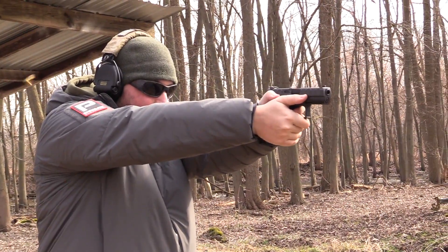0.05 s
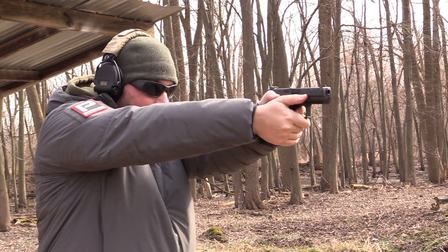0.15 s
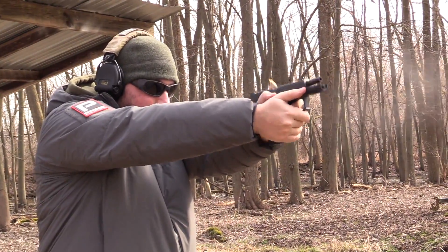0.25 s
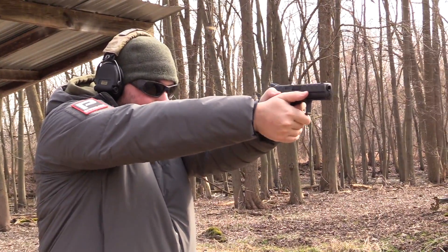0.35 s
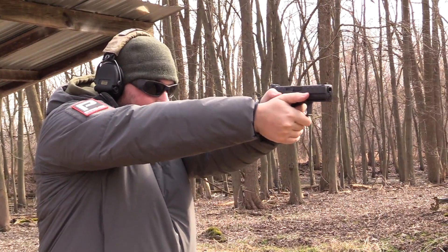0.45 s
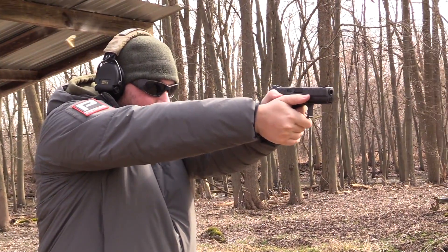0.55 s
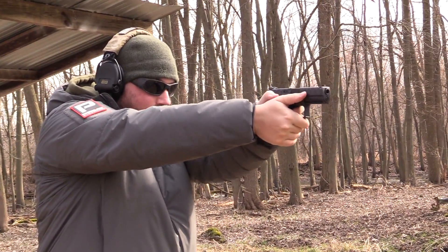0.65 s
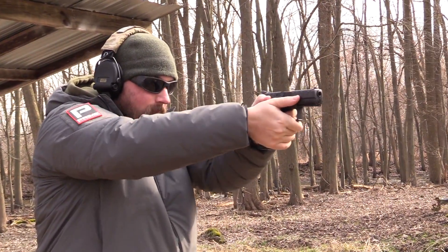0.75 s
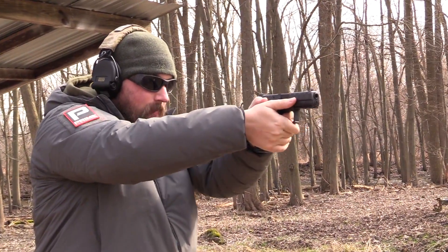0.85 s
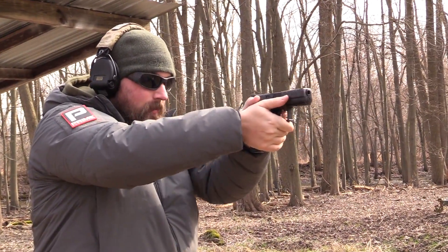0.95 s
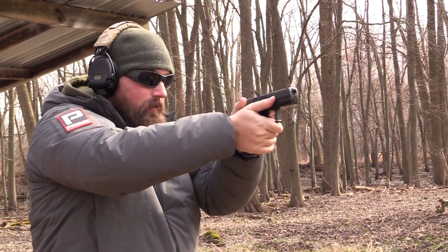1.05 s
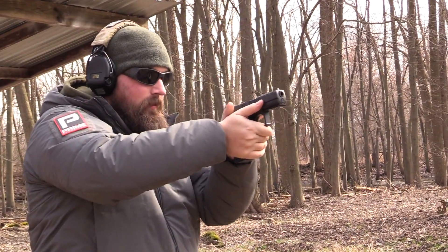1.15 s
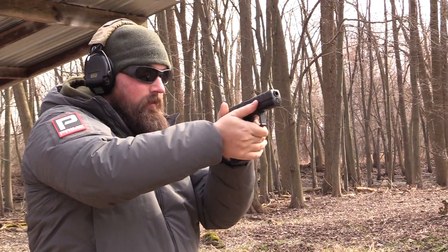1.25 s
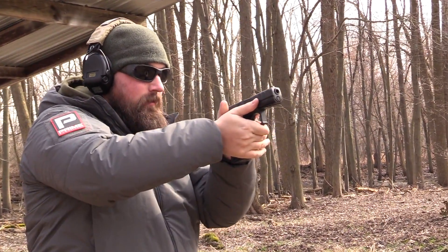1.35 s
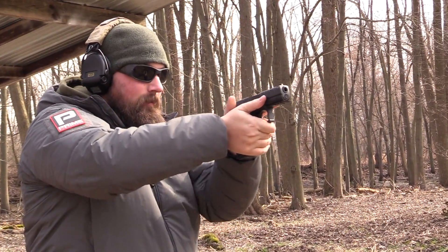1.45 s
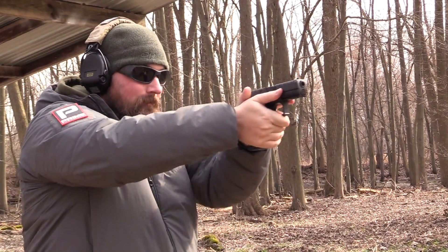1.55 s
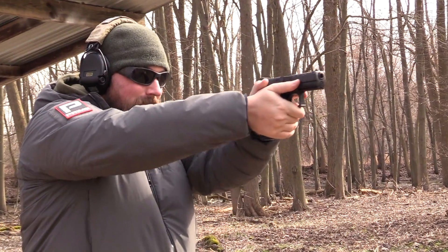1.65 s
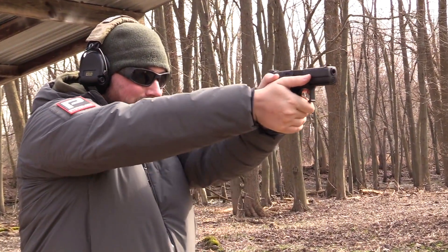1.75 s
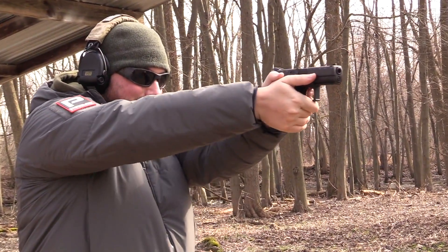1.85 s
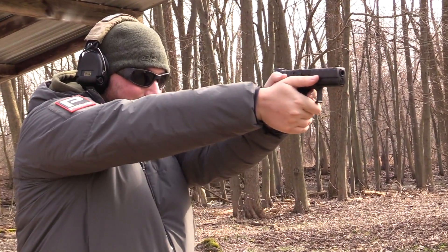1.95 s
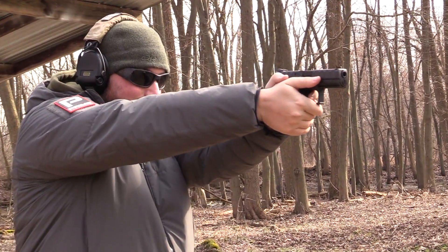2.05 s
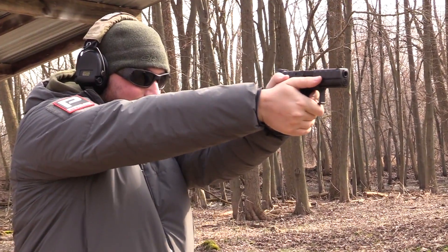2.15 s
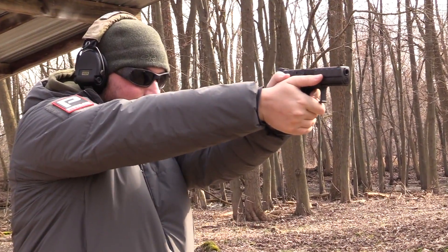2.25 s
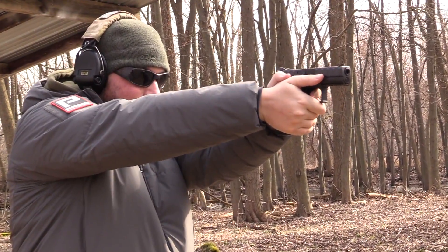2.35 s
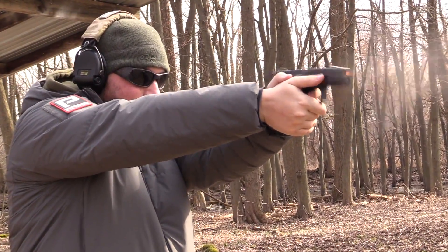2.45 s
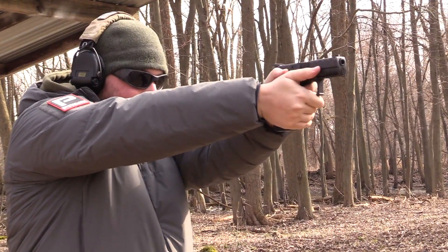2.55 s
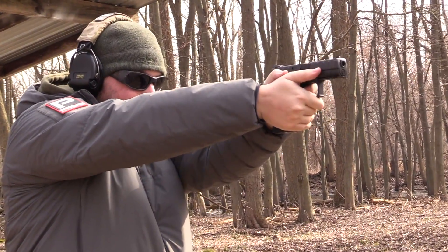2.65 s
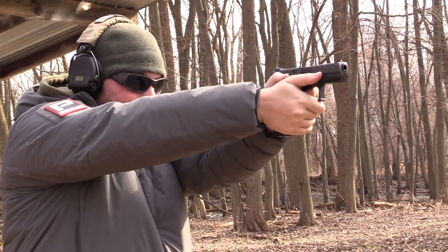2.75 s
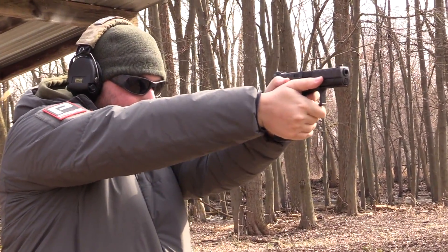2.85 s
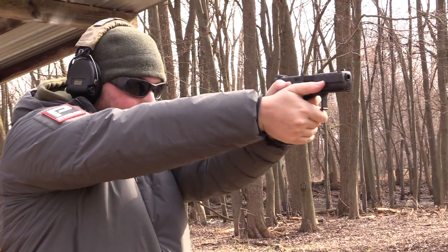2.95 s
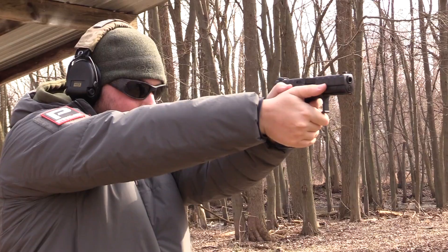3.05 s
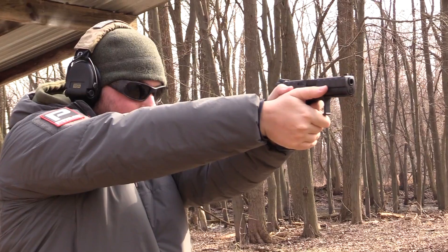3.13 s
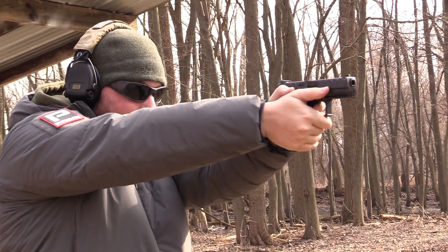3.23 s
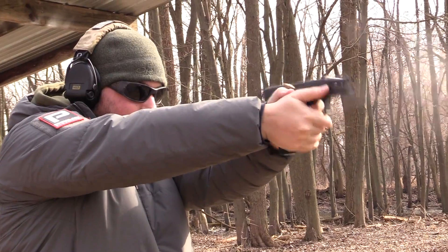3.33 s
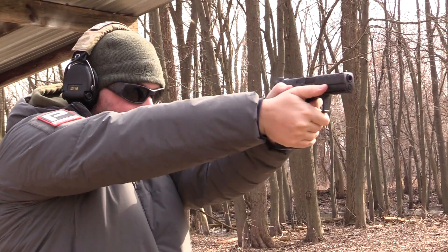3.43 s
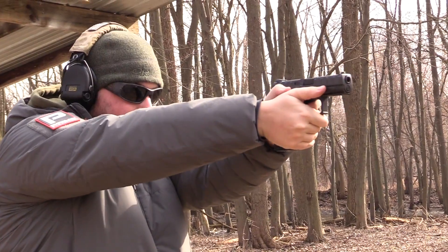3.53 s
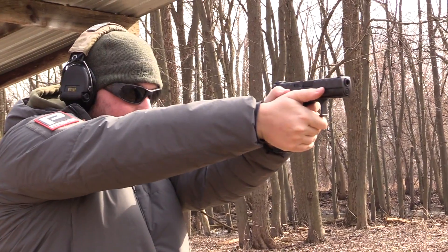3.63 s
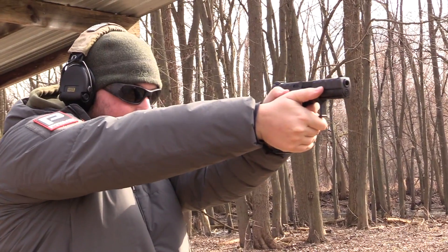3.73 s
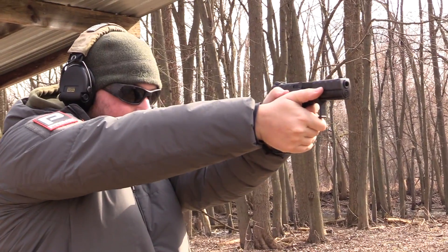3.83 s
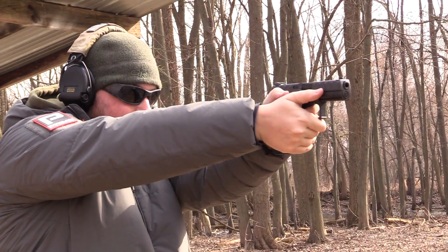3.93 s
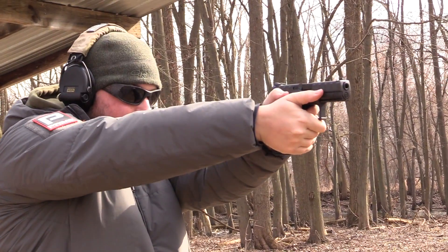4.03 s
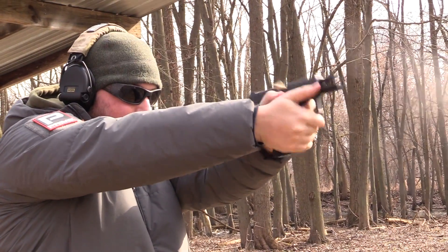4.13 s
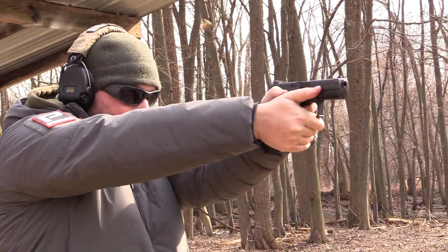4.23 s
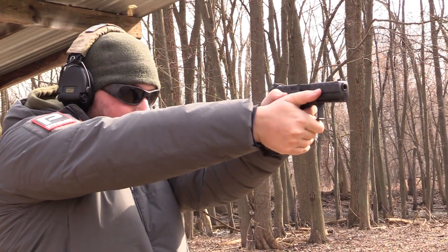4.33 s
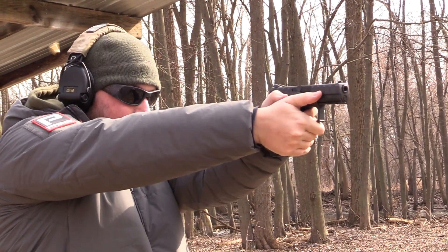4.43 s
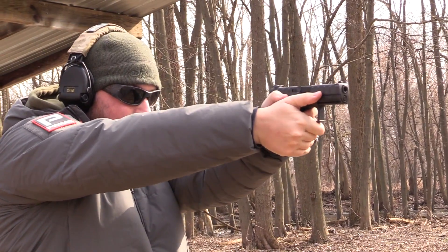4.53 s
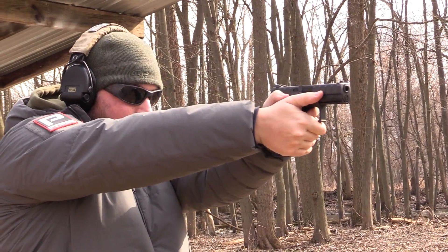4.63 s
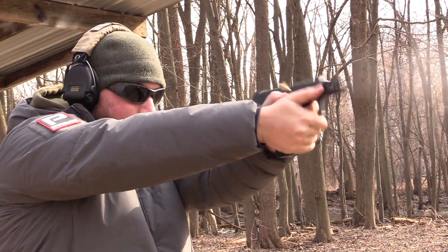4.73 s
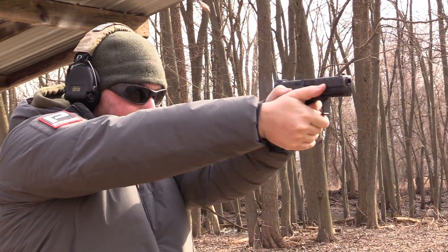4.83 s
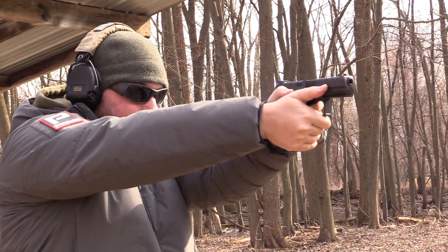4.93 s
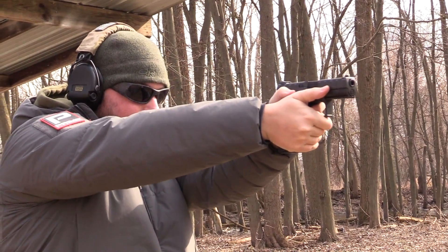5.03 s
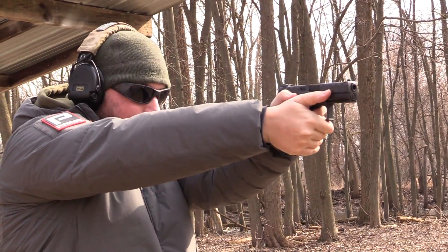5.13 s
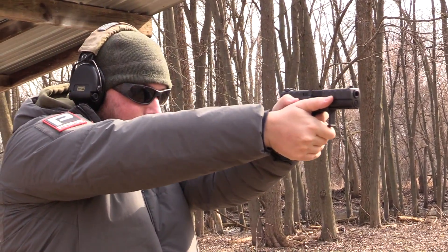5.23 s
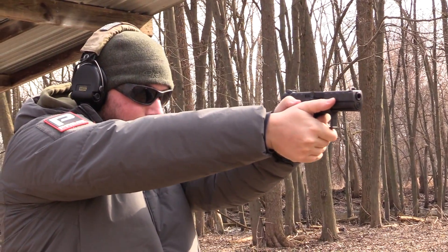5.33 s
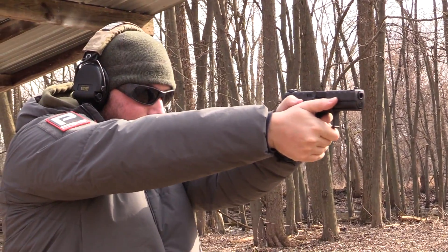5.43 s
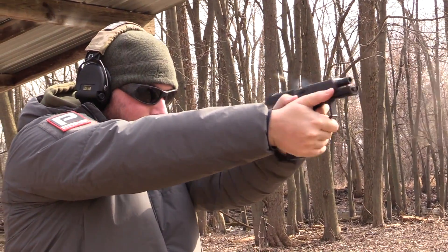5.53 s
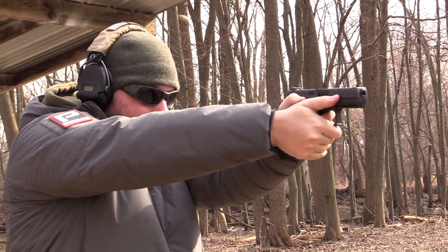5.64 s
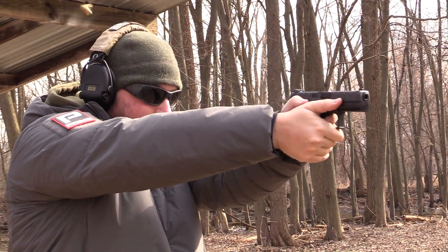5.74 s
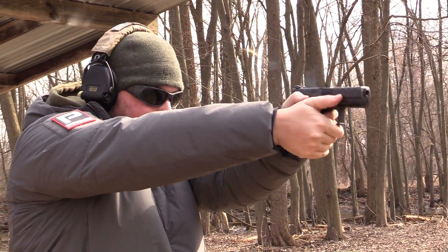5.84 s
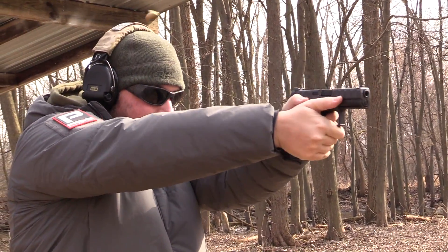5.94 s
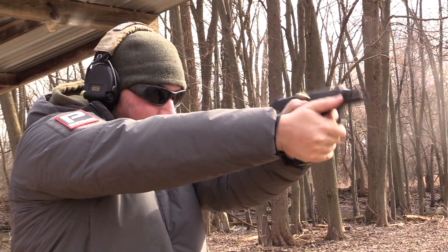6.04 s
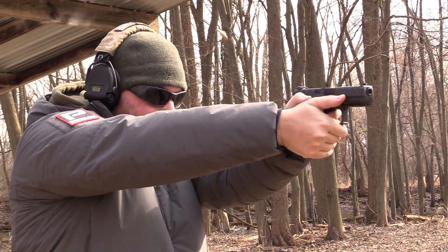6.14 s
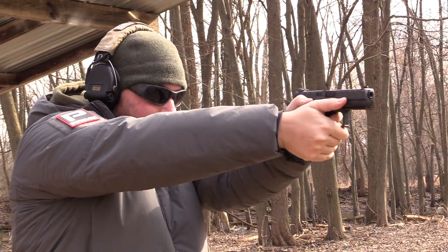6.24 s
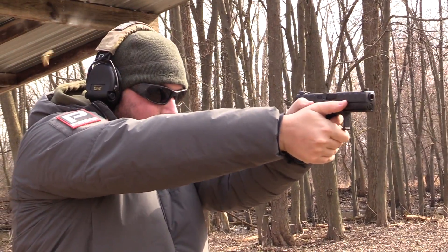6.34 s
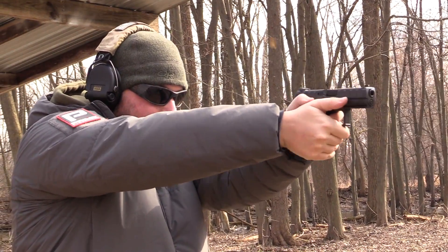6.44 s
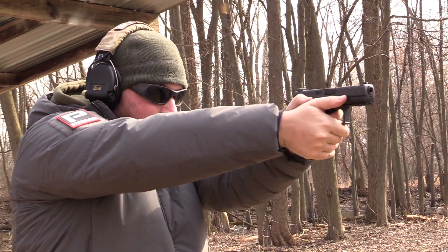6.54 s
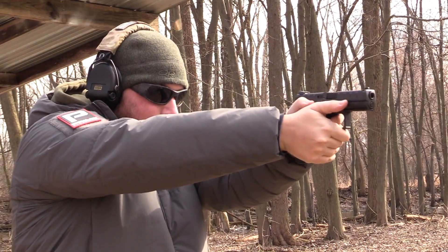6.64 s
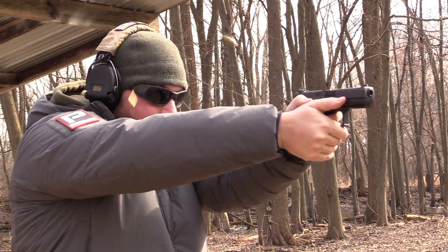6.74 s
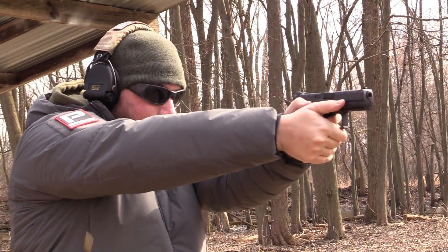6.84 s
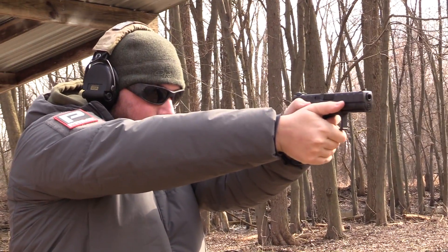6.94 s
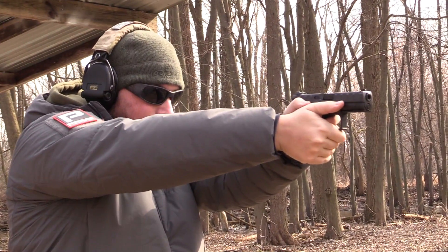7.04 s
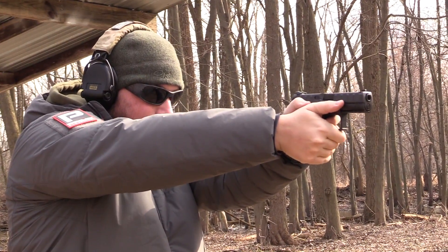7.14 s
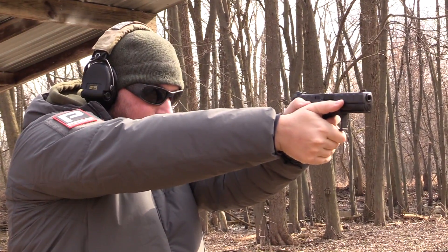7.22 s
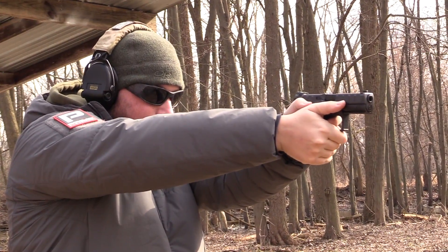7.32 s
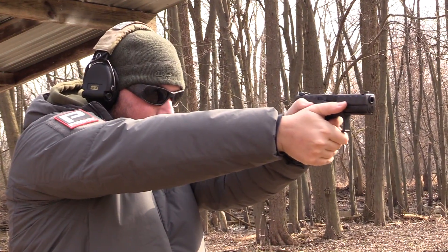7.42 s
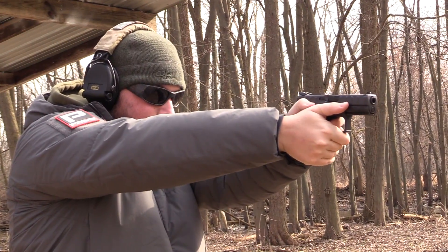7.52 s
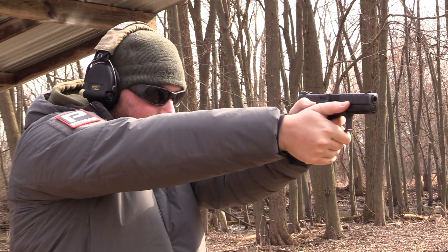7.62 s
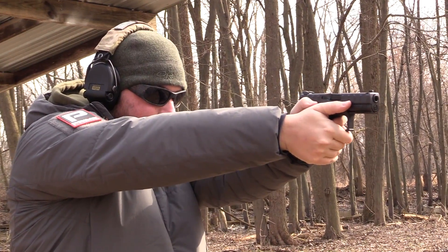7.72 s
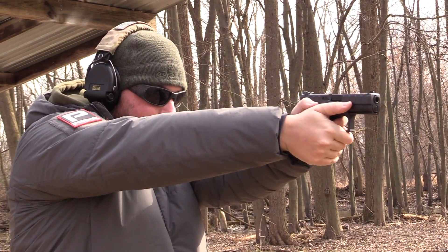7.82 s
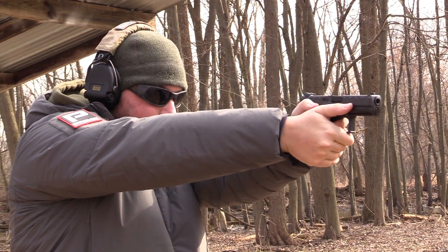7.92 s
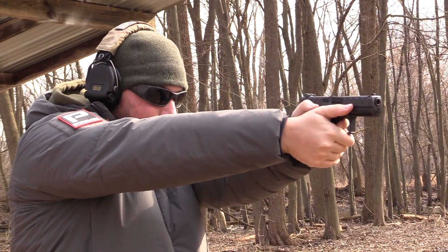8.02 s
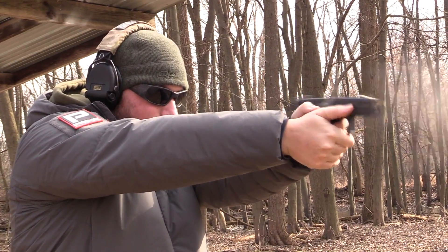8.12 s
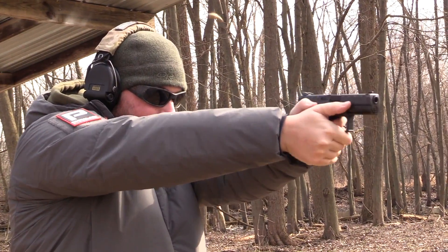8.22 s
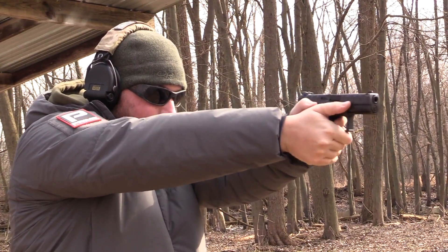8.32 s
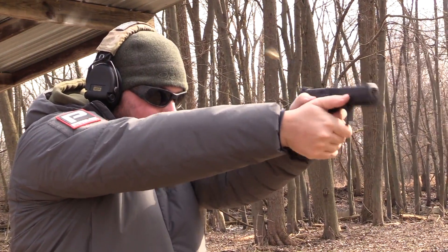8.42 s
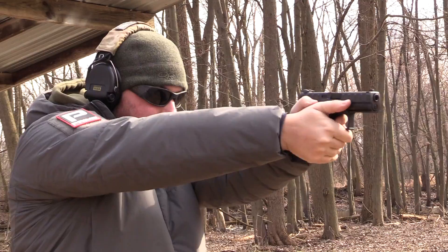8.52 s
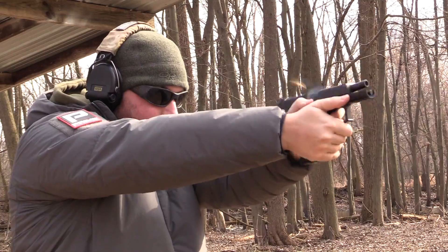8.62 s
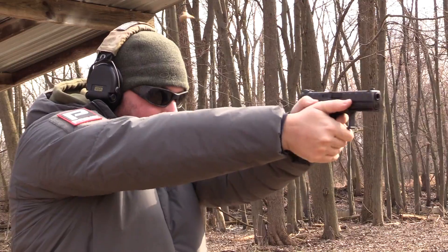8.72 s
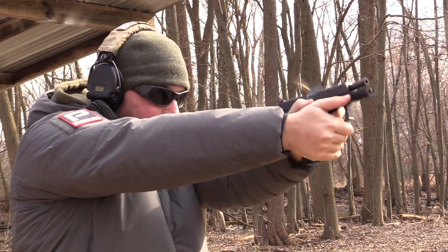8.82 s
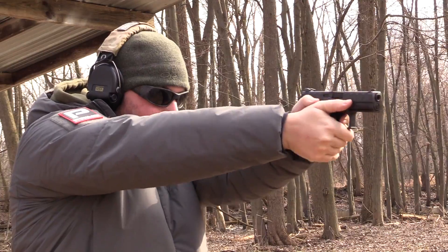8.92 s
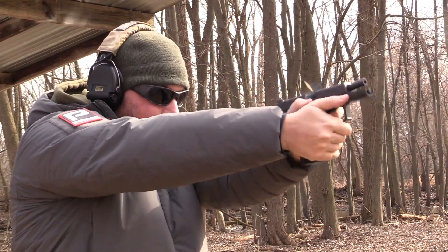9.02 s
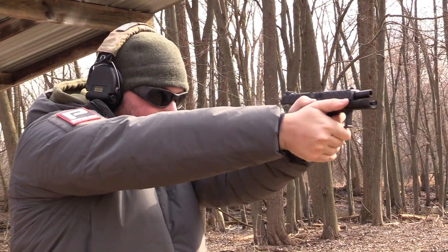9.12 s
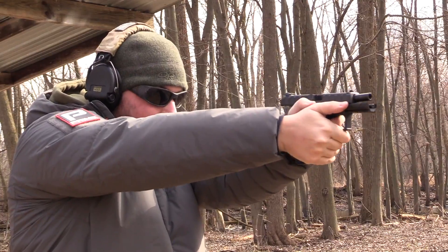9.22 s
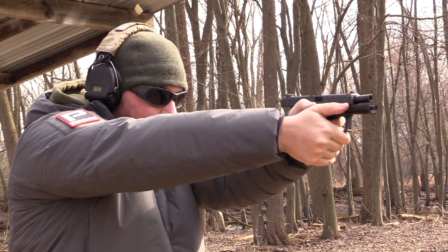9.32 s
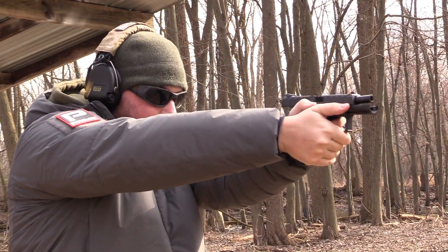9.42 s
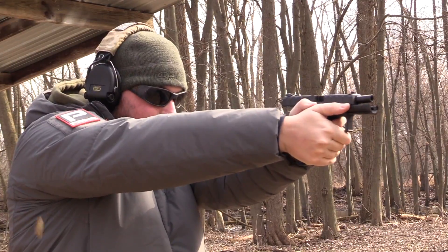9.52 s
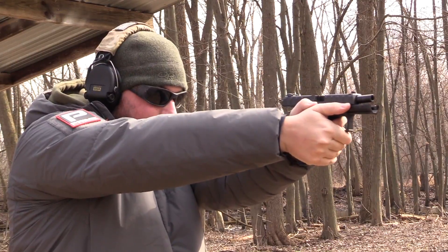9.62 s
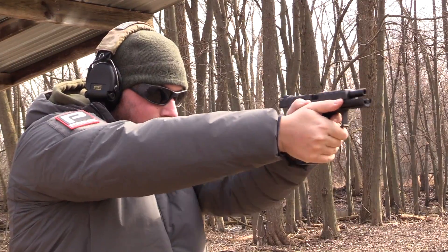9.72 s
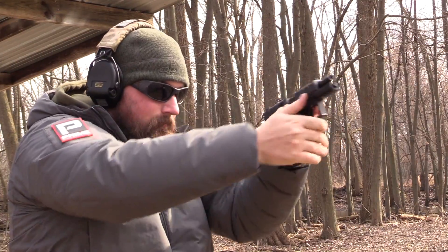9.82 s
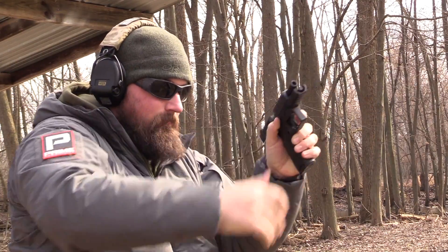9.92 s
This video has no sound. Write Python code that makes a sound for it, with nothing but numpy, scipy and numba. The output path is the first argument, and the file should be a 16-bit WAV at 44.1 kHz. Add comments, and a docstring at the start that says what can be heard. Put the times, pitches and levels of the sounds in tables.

```python
"""Range shelter at the edge of a wood: a pistol is fired fifteen times, close to a camera's microphone. Each
blast is a decaying push with echoes off shooter, ground, roof and backstop, then rolls on in the trees. Trigger
and grip click between shots, the slide clacks after each; spent cases clack down, ring and skitter. Blasts push
the capsule too; wind and amplifier hiss lie behind. The camera overloads and ducks at every shot, then slowly
lets echo, wind and hiss swell back."""
import sys
import numpy as np
from scipy import signal
from scipy.fft import rfft, irfft, next_fast_len
from scipy.io import wavfile
from numba import njit

SR = 44100
rng = np.random.default_rng(int(sys.argv[2]) if len(sys.argv) > 2 else 0)


def inscribe(sig):
    """Save sig as 16-bit PCM at rate SR to the path in sys.argv[1].

    A 1-D sig is mono; a 2-D sig holds one channel per row.
    Samples are clipped to [-1, 1] before scaling.
    """
    pcm = np.round(np.clip(np.atleast_2d(sig).T, -1, 1) * 32767)
    wavfile.write(sys.argv[1], SR, pcm.astype(np.int16))


N = 439677

# Shots; the first is fired just before the start, so only its tail is heard:
# start_s, relative_level_db, ignition_rasp_db, rasp_dull_above_hz
PISTOL_SHOTS = [(-.26, 2, -2, 14400), (0.3393, -1, 14.5, 14000), (2.56, -1.5, 9, 5970),
                (3.4378, -2, 6, 16000), (4.2320, -2.5, 9.5, 12000), (4.835, -2.5, 5, 14180),
                (5.6157, -0.5, 11, 17200), (5.8780, -2, 4, 14000), (6.1370, -2.5, -8, 14000),
                (6.466, -1, 9, 16000), (6.7745, -4, -3, 14000), (8.232, 0.5, -4.5, 19000),
                (8.4782, -1.5, -10.5, 14000), (8.7076, -2.5, -2, 14100), (8.9147, -4, -3, 14000),
                (9.1148, -4.5, -6, 14000)]
# Paths from muzzle to microphone, from arms and body to ground, roof and backstop:
# delay_ms, level_db, dull_above_hz
BLAST_ECHOES = [(.706, 2.5, 725), (1.461, 5, 234.5), (4.383, -10, 1200), (16.3, -37.5, 2100),
                (17.6, -36, 2900), (24.4, -59, 2100), (49.15, -37.5, 2600), (50.24, -37.5, 1200)]
# Reverberation of the wood: frequency_hz, density_db (per Hz, relative), t60_s
WOOD_REVERB = [(60, -4.5, 3), (200, -2, 1.7), (323, 2, 6.07), (628, -3.5, 4.97), (726, 0.5, 5.5),
               (1197, -2, 4.55), (1495, -11.5, 4.96), (2018, -9.5, 3.84), (2830, -16.5, 2.78),
               (4540, -19, 1.83), (6340, -18.5, 1.08), (9600, -16.5, .78), (15900, -21.5, 0.79)]
# Scatter from the shelter's posts and rafters: frequency_hz, density_db (per Hz, relative), t60_s
SHELTER_SCATTER = [(98.8, -11.5, 0.16), (369.7, 0.5, 0.1), (900, -5.5, 0.17), (1880, -13.5, 0.11),
                   (4790, -23.5, 0.15), (15000, -23, 0.14)]
# Trigger and grip clicks: start_s, level_db
TRIGGER_CLICKS = [(.933, -46), (1.02, -28.5), (2.5104, -48), (3.3428, -29.5), (4.1419, -34), (4.7396, -40),
                  (5.498, -32), (5.5766, -50.5), (8.0964, -27), (8.1811, -43.5), (9.806, -35.5)]
# The trigger's steel parts: frequency_hz, relative_level_db, t60_s
TRIGGER_MODES = [(6030, -39, 0.011), (8370, -4, .02), (10800, 1, .02), (14070, 1, .015)]
# Spent cases landing or bouncing: start_s, clack_db, knock_db (what they hit), knock_pitch_ratio,
# ring_hz, ring_db, second_end_delay_s
CASE_LANDINGS = [(1.12, -22.5, -26, 1.26, 10910, -29.5, .02), (3.371, -12, -12.5, 1.016, 11330, -28, .011),
                 (7.263, -37, -55, 0.88, 10650, -31, .002), (7.400, -54, -60.5, 0.96, 10400, -45, .002),
                 (7.573, -21, -40, 1, 10350, -31, 0.018), (7.966, -52, -62.5, 1, 10470, -45, 0.00203),
                 (9.523, -30, -50, 1, 10480, -53, .052), (9.699, -48.5, -55, 1.01, 11940, -45, .002),
                 (9.701, -52, -58, 1, 10340, -48.5, 0.0017), (9.9499, -18, -32, 1.24, 10380, -44, 0.037)]
# A brass case rings in a close pair and weaker modes: ratio_to_ring_hz, relative_level_db, t60_s
BRASS_MODES = [(1, 0, .2), (.995, -4, .19), (.965, -12, .12), (1.355, -13, .14)]
# Short clack of a case pressed against what it hit: frequency_hz, relative_level_db, t60_s
CLACK_MODES = [(2420, -4.5, .04), (4360, -6, 0.073), (5700, 1, .025), (6500, -26, .025), (9450, 6.5, 0.021)]
# The shelter's sheet metal, knocked by a case:
# frequency_hz (before the knock pitch ratio), relative_level_db, t60_s
SHEET_MODES = [(1180, -5, 0.048), (1270, 7, 0.052), (1335, -4, 0.087), (1730, -18, 0.07),
               (2450, -25, 0.043)]
# Wind and distant countryside: frequency_hz, density_db (per Hz, relative)
AIR_SPECTRUM = [(25, 5.5), (75, 5.5), (140, -4), (250, -7), (450, -20), (620, -24.5), (900, -24),
                (1500, -43.5), (3000, -41.5), (6000, -63)]

TRIGGER_DB, CLACK_DB = -2.5, -10  # struck modes, relative to their contact noise
SECOND_END_DB = 1  # tick of a case's second end, relative to the ring it starts
SKITTER_S, SKITTER_DB = 0.046, -17  # skitter time, and its level below the first clack
# The slide clacks this long after each shot, at this mean level, with this random spread
SLIDE_CYCLE_S, SLIDE_DB, SLIDE_SCATTER_DB = .0503, -13.5, 3
TOP_HZ = 15600  # upper limit of the camera's sound


def undb(db):
    """Decibels to gain."""
    return 10 ** (np.asarray(db) / 20)


def seconds(length_s):
    """A time axis in seconds."""
    return np.arange(int(length_s * SR)) / SR


def add(track, start_s, sound):
    """Mix a sound into the track, trimming whatever falls outside it."""
    start = int(round(start_s * SR))
    part = sound[max(-start, 0):max(len(track) - start, 0)]
    first = max(start, 0)
    track[first:first + len(part)] += part


def one_pole(x, hz, kind="low"):
    """A gentle 6 dB per octave filter."""
    return signal.lfilter(*signal.butter(1, min(hz, .45 * SR), kind, fs=SR), x)


def along(hz, table, axis=1):
    """Read a column of a table along a log-frequency axis."""
    columns = np.transpose(table)
    return np.interp(np.log(np.maximum(hz, 1)), np.log(columns[0]), columns[axis])


def noise(count, colour):
    """Noise of rms 1 with a given spectrum."""
    hz = np.fft.rfftfreq(count, 1 / SR)
    x = irfft(rfft(rng.standard_normal(count)) * undb(along(hz, colour)), count)
    return x / x.std()


def modes(t, table, scale=1):
    """Fading sines of a struck object, all frequencies multiplied by scale."""
    out = np.zeros(len(t))
    for hz, db, t60 in table:
        out += undb(db - 60 * t / t60) * np.sin(2 * np.pi * scale * hz * t)
    return out


def tick(t, decay_s, hz=8000, spread_db=-20, spread_s=0.017):
    """A hard little contact, brightest around hz, with a short wash from the shelter."""
    colour = [(hz / 10, -16), (hz / 2, -7), (hz, 0), (hz * 2, -9)]
    envelope = np.exp(-t / decay_s) + undb(spread_db) * np.exp(-t / spread_s)
    return noise(len(t), colour) * envelope


def scattered(x, wash_db=-5, wash_s=0.0082):
    """A sound with its faint, dense reflections from the shelter, which make a pure ring flutter."""
    t = seconds(.1)
    wash = rng.standard_normal(len(t)) * np.exp(-t / wash_s)
    wash /= np.linalg.norm(wash)
    return x + undb(wash_db) * signal.fftconvolve(x, wash)[:len(x)]


def reverberation(table, t, grain_db):
    """Countless small uneven echoes, starting at rms 1; every band dies away at its own rate."""
    count = next_fast_len(len(t))
    hz = np.fft.rfftfreq(count, 1 / SR)
    echoes = rng.standard_normal(count) * undb(grain_db * rng.standard_normal(count))
    spectrum = rfft(echoes) * undb(along(hz, table))
    spectrum /= irfft(spectrum, count).std()
    centres, _, t60s = np.transpose(table)
    out = np.zeros(len(t))
    for one_band, t60 in zip(np.eye(len(table)), t60s):
        # Each band's share crossfades into its neighbours'
        share = along(hz, np.c_[centres, one_band])
        out += irfft(spectrum * share, count)[:len(t)] * undb(-60 * t / t60)
    return out


def blast(push_ms=0.51, dull_hz=1810, gas_db=-28, gas_ms=3):
    """The muzzle's shock front and turbulent gas, with the distinct echoes of the shock."""
    t = seconds(.07)
    ms = t * 1000
    shock = np.exp(-ms / push_ms)
    out = one_pole(shock, dull_hz)
    for delay_ms, db, hz in BLAST_ECHOES:
        echo = one_pole(one_pole(shock, hz), hz)
        add(out, delay_ms / 1000, undb(db) * echo)
    gas = np.exp(-ms / gas_ms) * one_pole(rng.standard_normal(len(t)), 5200)
    return out + undb(gas_db) * gas


def ignition(lead_s, dull_hz):
    """Striker and the air driven out ahead of the bullet: a rasp that grows until the blast."""
    t = seconds(lead_s)
    colour = [(900, -21.5), (2300, -9), (4200, -15), (7200, -15.5), (14000, -15.5)]
    rasp = noise(len(t), colour) * np.sqrt(t / lead_s)
    return one_pole(one_pole(rasp, dull_hz), dull_hz)


def pistol(blast_db=50, lead_s=0.0022, shelter_db=5, wood_db=-17, wood_rise_s=0.036):
    """Rasp, blast and tail of every shot; all set off the same shelter and the same trees."""
    short, long = seconds(.4), seconds(4)
    trees = reverberation(WOOD_REVERB, long, grain_db=6)
    rafters = reverberation(SHELTER_SCATTER, short, grain_db=5)
    tail = undb(wood_db) * trees * (1 - np.exp(-long / wood_rise_s))
    add(tail, .003, undb(shelter_db) * rafters)
    out = np.zeros(N)
    for s, db, rasp_db, rasp_hz in PISTOL_SHOTS:
        add(out, s - lead_s, undb(rasp_db) * ignition(lead_s, rasp_hz))
        add(out, s, undb(db + blast_db) * blast())
        add(out, s, undb(db) * tail)
    return out


def thump(thump_db=20, hz=65, decay_s=.011, late_s=0.0069):
    """The slow suction and rebound behind each blast push on the capsule directly, as wind does."""
    out, t = np.zeros(N), seconds(.1)
    wave = -np.sin(2 * np.pi * hz * t) * np.exp(-t / decay_s)
    for s, db, *_ in PISTOL_SHOTS:
        add(out, s + late_s, undb(db + thump_db) * wave)
    return out


def action():
    """Trigger and grip click as contact noise and steel modes; after each shot the slide gives a bright clack."""
    out, t = np.zeros(N), seconds(.15)
    steel = undb(TRIGGER_DB) * modes(t, TRIGGER_MODES)
    for s, db in TRIGGER_CLICKS:
        add(out, s, undb(db) * (tick(t, decay_s=0.0025, hz=8520) + steel))
    for s, *_ in PISTOL_SHOTS:
        db = SLIDE_DB + SLIDE_SCATTER_DB * rng.standard_normal()
        add(out, s + SLIDE_CYCLE_S, undb(db) * tick(t, decay_s=0.0016, hz=6500))
    return out


def cases():
    """One end clacks and knocks what it hits; the other follows, the brass rings and the case skitters."""
    out, t = np.zeros(N), seconds(.3)
    pressed = undb(CLACK_DB) * modes(t, CLACK_MODES)
    for s, clack_db, knock_db, knock_pitch, ring_hz, ring_db, follow_s in CASE_LANDINGS:
        contact = tick(t, decay_s=0.0023, hz=6400, spread_db=-18.5, spread_s=.025)
        clack = undb(clack_db) * (contact + pressed)
        sheet = modes(t, SHEET_MODES, knock_pitch)
        knock = undb(knock_db) * scattered(sheet, wash_db=-1.5, wash_s=0.021)
        add(out, s, clack + knock)
        second_tick = undb(SECOND_END_DB) * tick(t, decay_s=0.0038, hz=10500)
        ring = scattered(modes(t, BRASS_MODES, ring_hz))
        add(out, s + follow_s, undb(ring_db) * (second_tick + ring))
        # Three fainter clacks at random moments, weaker the later they fall
        for share in rng.uniform(size=3):
            skitter = undb(SKITTER_DB) * (1 - share) * clack
            add(out, s + follow_s + share * SKITTER_S, skitter)
    return out


def air(air_db=-28.5, gust_db=1.26, hiss_db=-54.5):
    """Wind wavering on the capsule, its level drifting at random, and the amplifier's steady hiss."""
    # A new random level every 0.1 s, joined by straight lines
    gusts = np.interp(np.arange(N) / SR, np.arange(100) / 10, rng.standard_normal(100))
    wind = undb(air_db + gust_db * gusts) * noise(N, AIR_SPECTRUM)
    return wind + undb(hiss_db) * rng.standard_normal(N)


def microphone(x, hz=404, damping=0.67):
    """The small microphone loses the bass of airborne sound and rings just above its cut."""
    return signal.lfilter(*signal.bilinear([1, 0, 0], [1, damping, 1], SR / (2 * np.pi * hz)), x)


def scene():
    """Pistol, its action, falling cases and moving air at the one microphone."""
    airborne = microphone(pistol() + action() + cases())
    return (airborne + thump() + air())[None]


@njit
def gain_control(x, held_db, threshold_db, slope, feedback, attack_s, release_db_per_s,
                 open_hz, shut_hz, shut_db):
    """Held peaks, counting more at open gain, duck the level a little late; a bass cut closes with it."""
    y, band, low, duck_db = np.empty(len(x)), 0., 0., held_db
    for i in range(len(x)):
        level_db = 20 * np.log10(abs(x[i]) + 1e-9)
        over_db = slope * (level_db - feedback * duck_db - threshold_db)
        held_db = max(held_db - release_db_per_s / SR, over_db, 0.)
        duck_db += (held_db - duck_db) / (attack_s * SR)
        # Second-order high-pass whose cut rises with the ducking
        cut_hz = open_hz + (shut_hz - open_hz) * min(duck_db / shut_db, 1.) ** 1.5
        g = np.tan(np.pi * cut_hz / SR)
        v = (band + g * (x[i] - low)) / (1 + g * (g + np.sqrt(2)))
        high = x[i] - np.sqrt(2) * v - low - g * v
        y[i] = high * 10 ** (-duck_db / 20)
        band, low = 2 * v - band, low + 2 * g * v
    return y


def record(dry):
    """The camera ducks too late, so blasts are clipped flat; then bass and top are trimmed."""
    # It starts already ducked, from the shot before the start
    ducked = gain_control(dry[0], held_db=31.5, threshold_db=-8.5, slope=0.66, feedback=0.2338,
                          attack_s=0.008, release_db_per_s=23.5,
                          open_hz=25.8, shut_hz=159.0, shut_db=22.5)
    clipped = one_pole(np.clip(ducked, -1, 1), 9.1, "high")
    top_cut = signal.ellip(8, .1, 80, TOP_HZ, fs=SR, output="sos")
    return signal.sosfilt(top_cut, clipped)[None]


dry = scene()
out = record(dry)
inscribe(out)
```